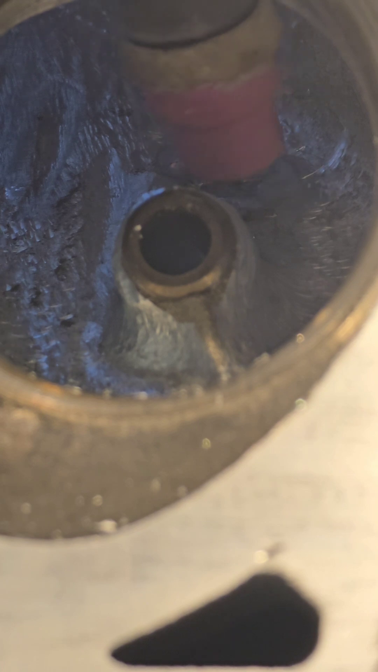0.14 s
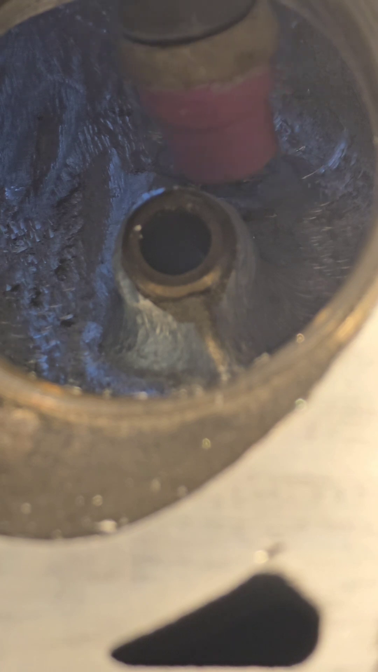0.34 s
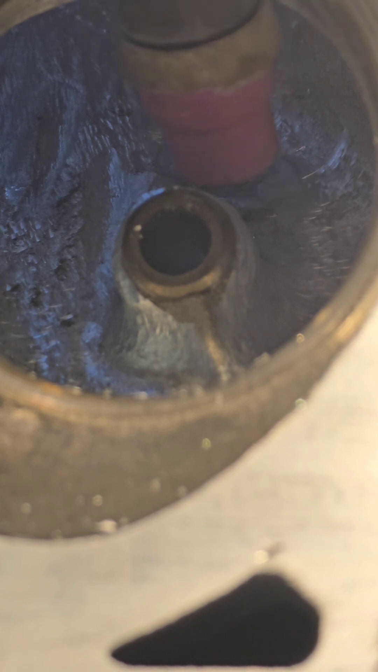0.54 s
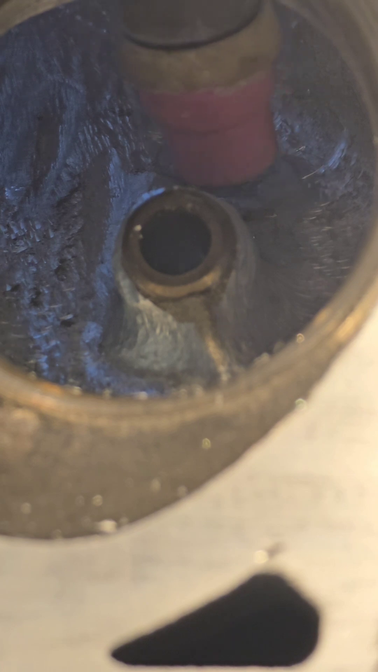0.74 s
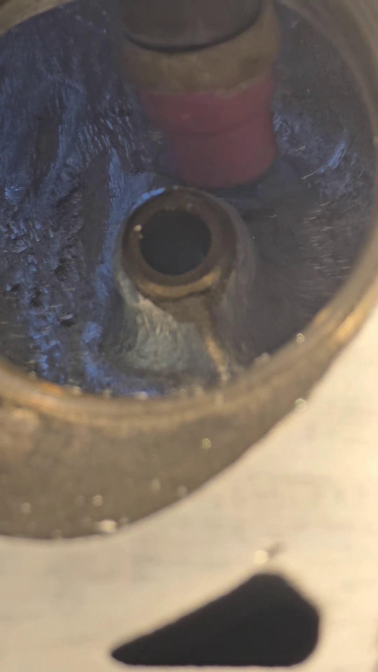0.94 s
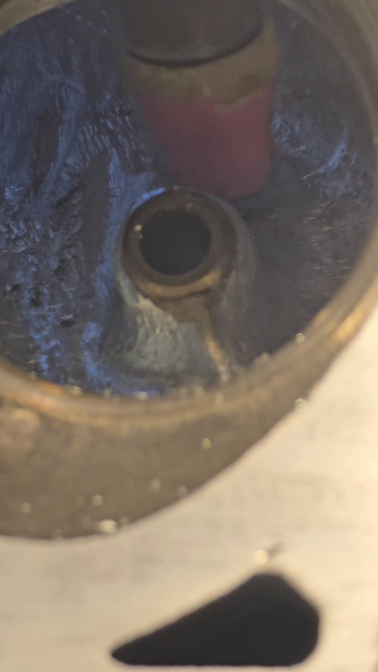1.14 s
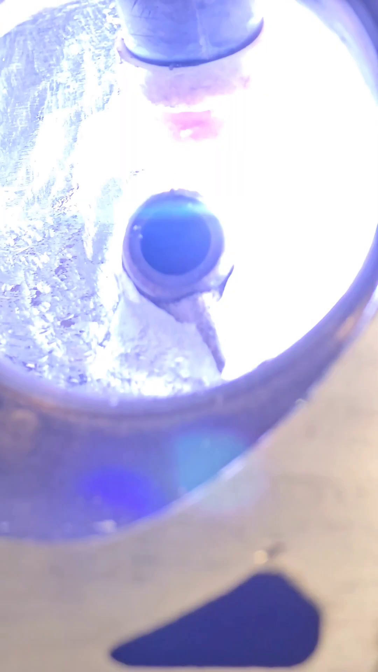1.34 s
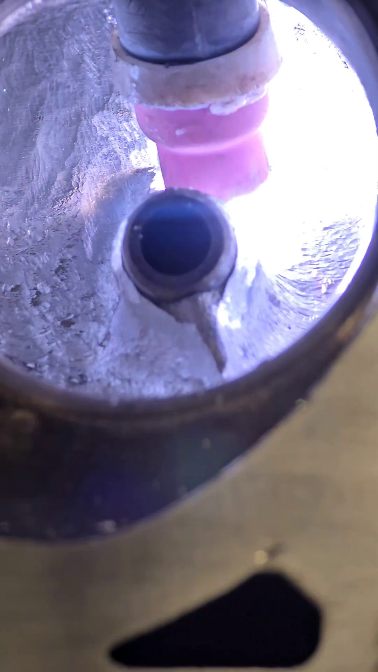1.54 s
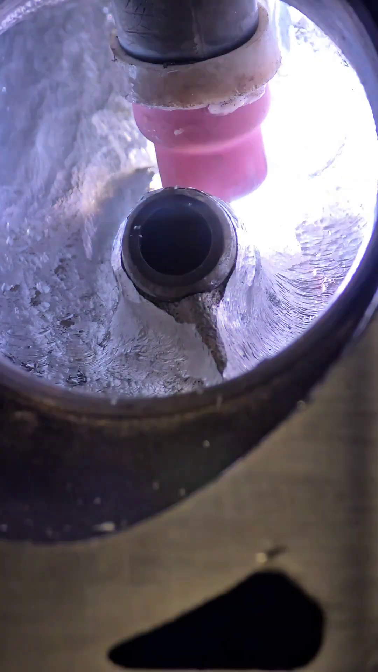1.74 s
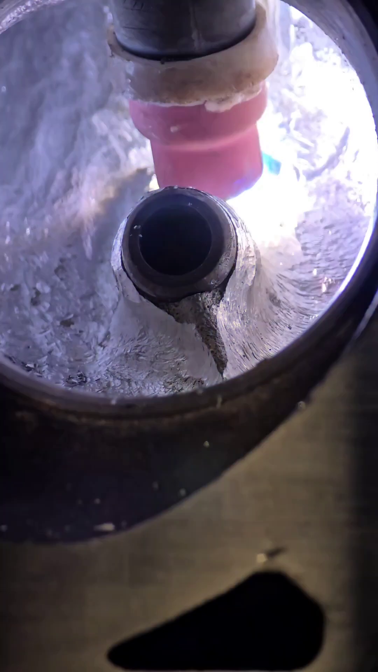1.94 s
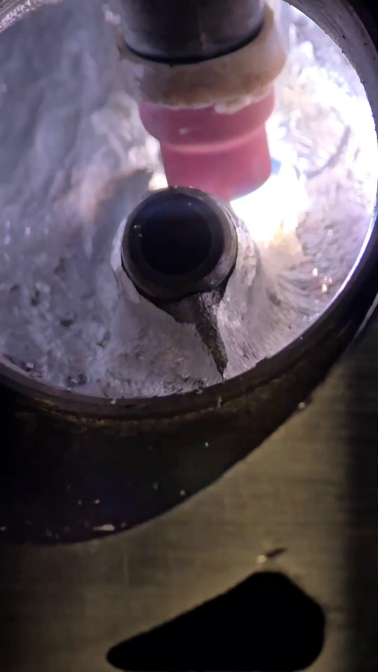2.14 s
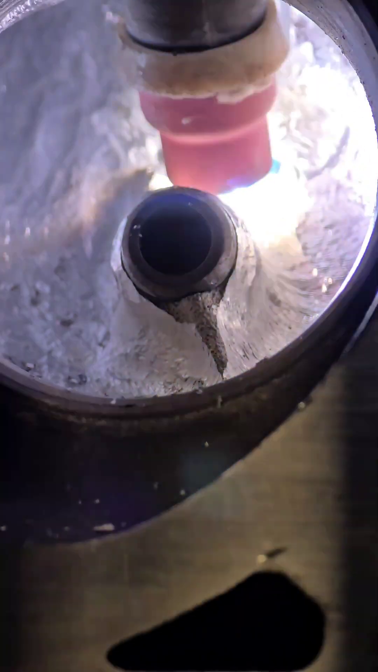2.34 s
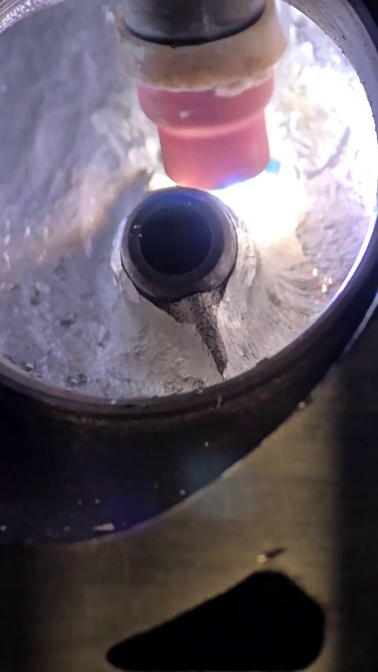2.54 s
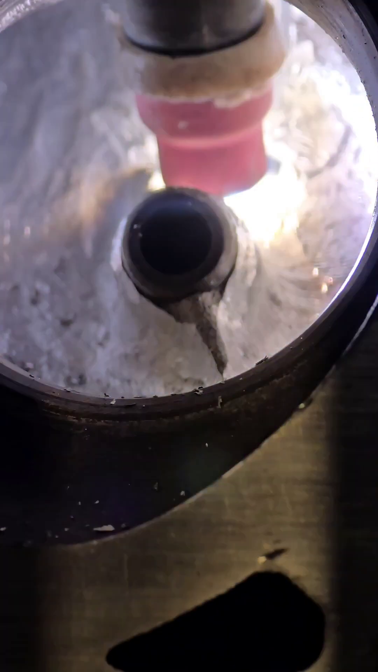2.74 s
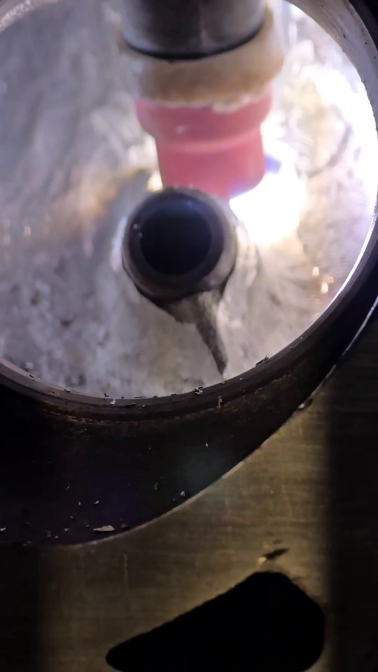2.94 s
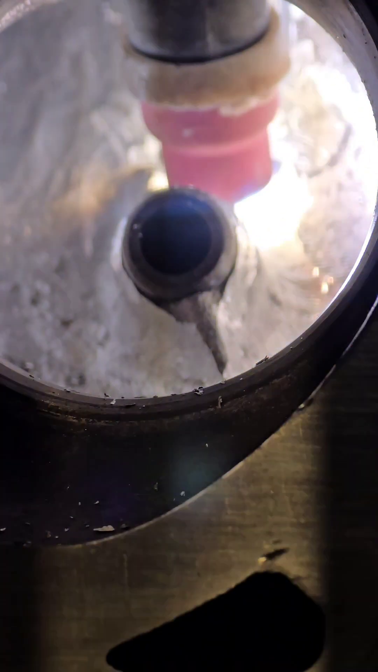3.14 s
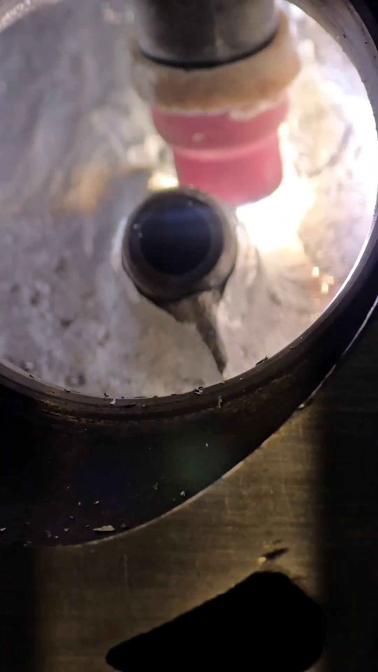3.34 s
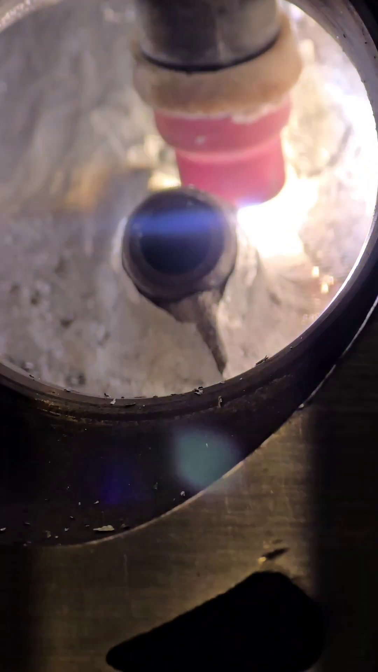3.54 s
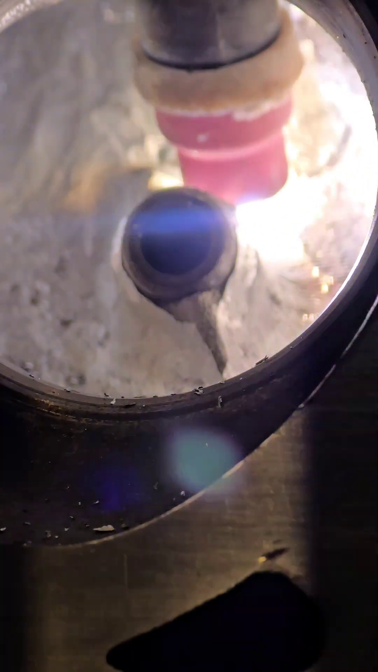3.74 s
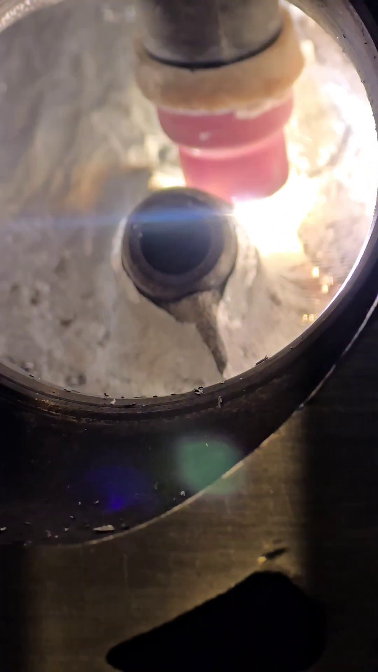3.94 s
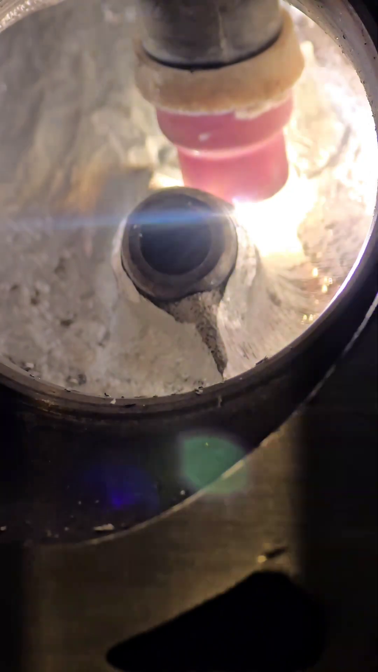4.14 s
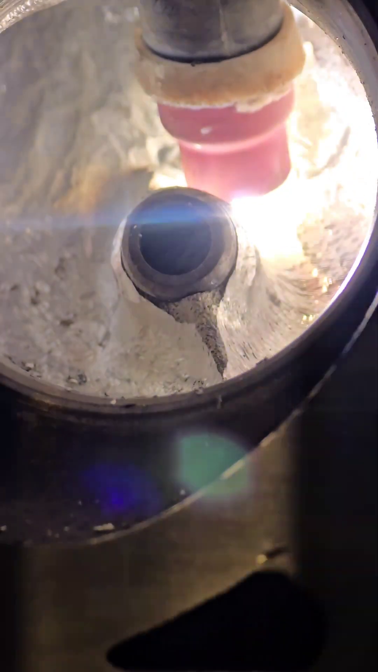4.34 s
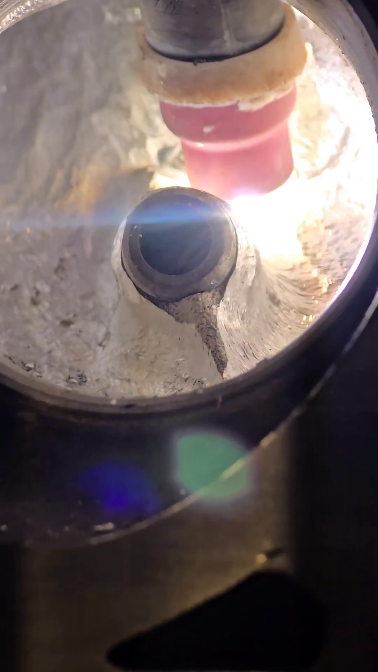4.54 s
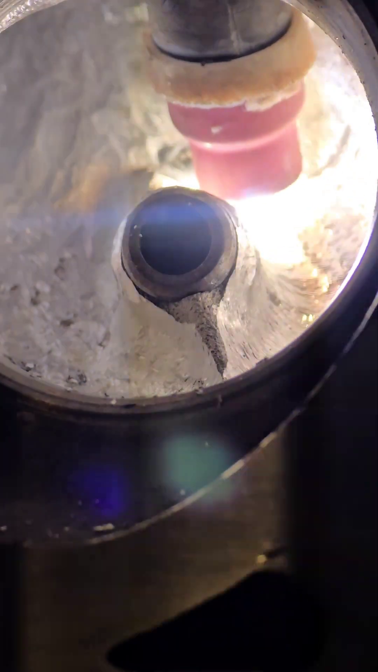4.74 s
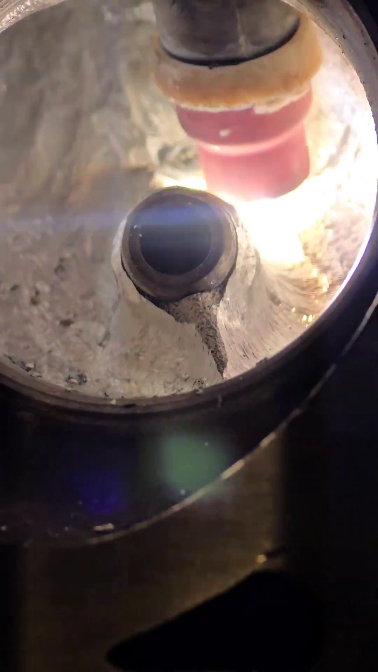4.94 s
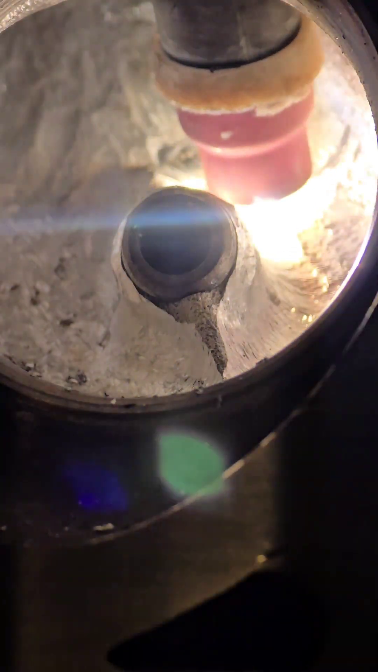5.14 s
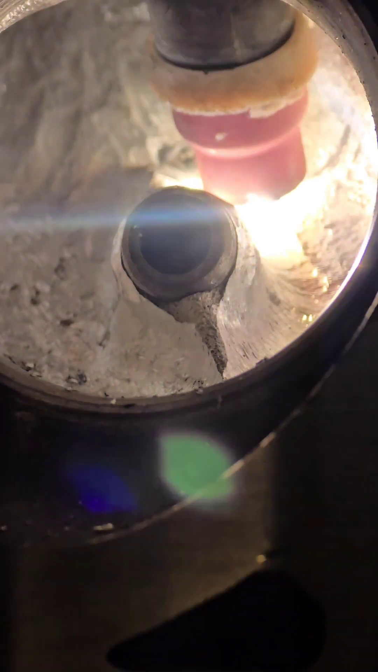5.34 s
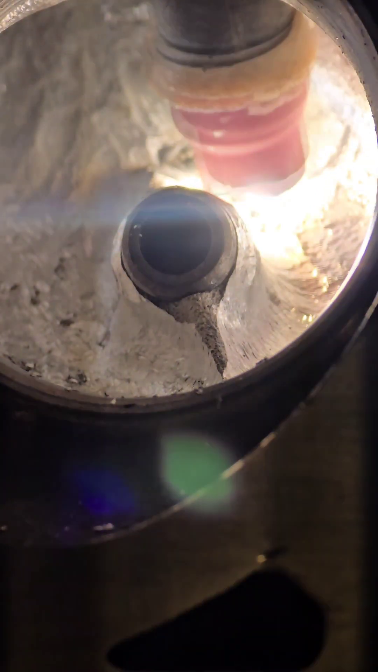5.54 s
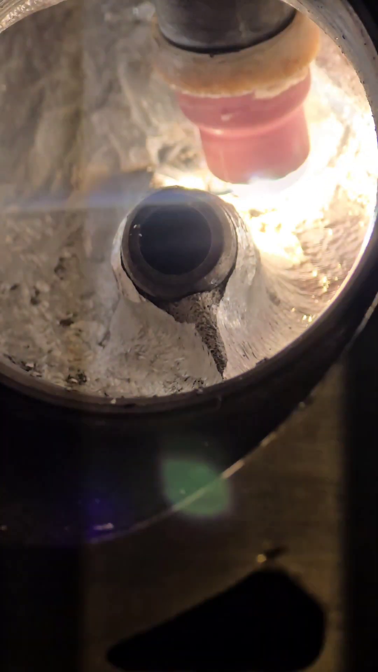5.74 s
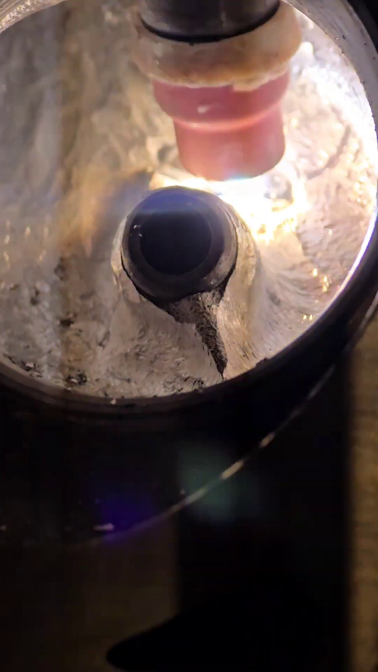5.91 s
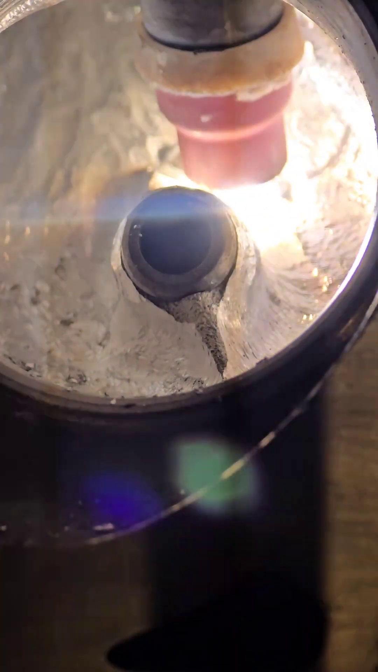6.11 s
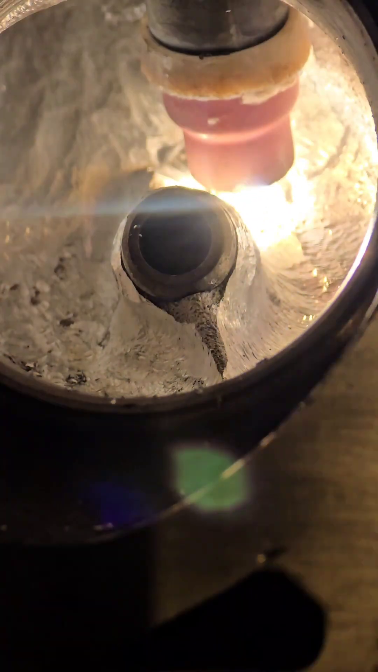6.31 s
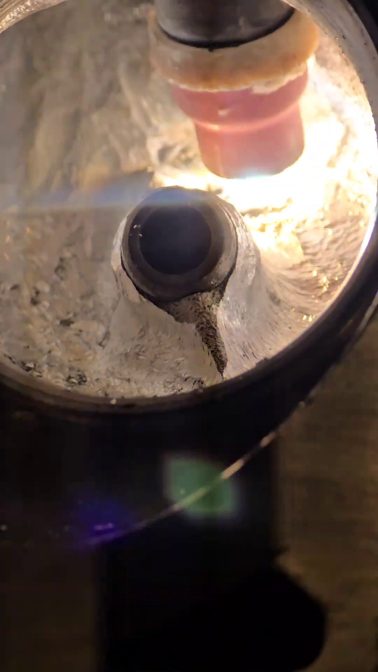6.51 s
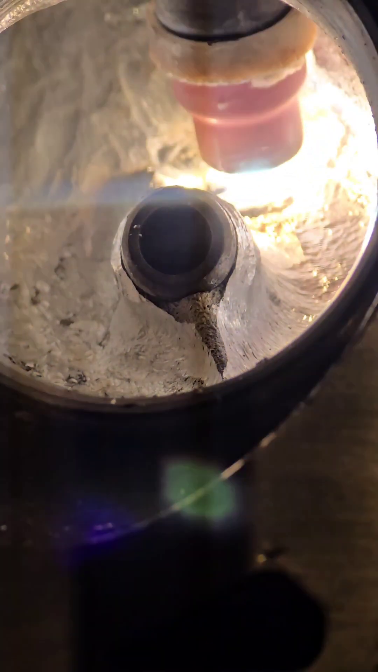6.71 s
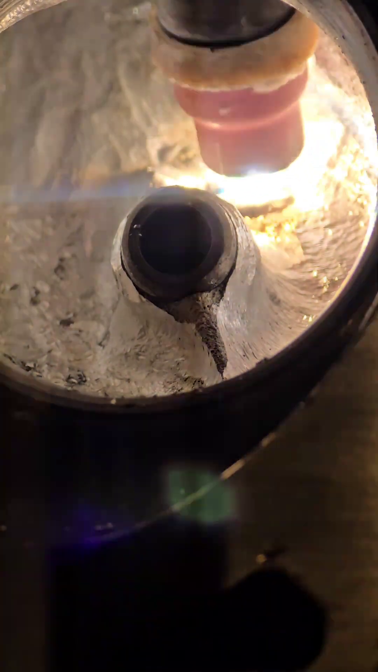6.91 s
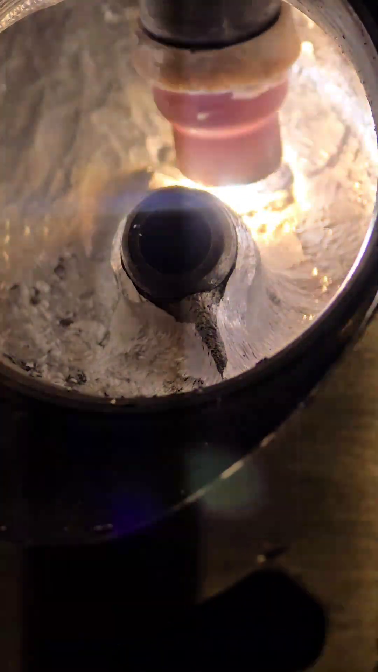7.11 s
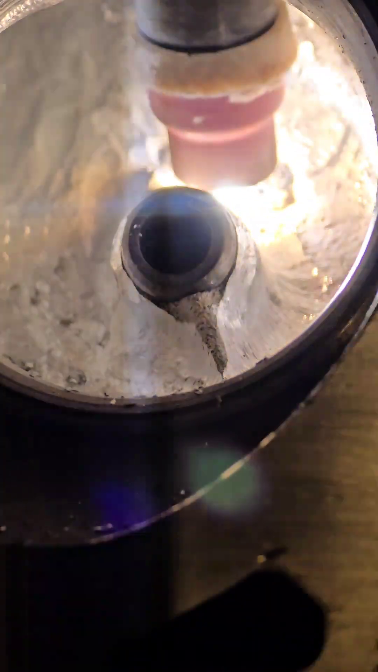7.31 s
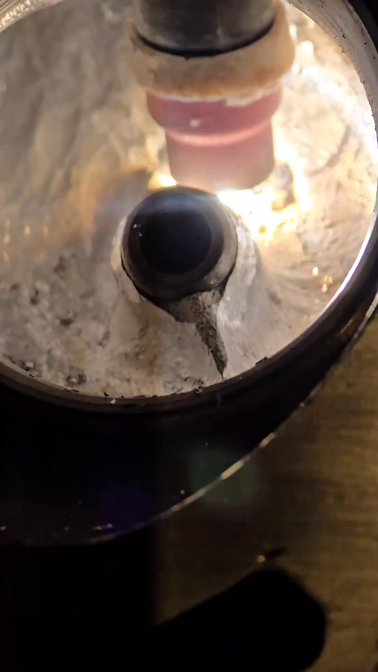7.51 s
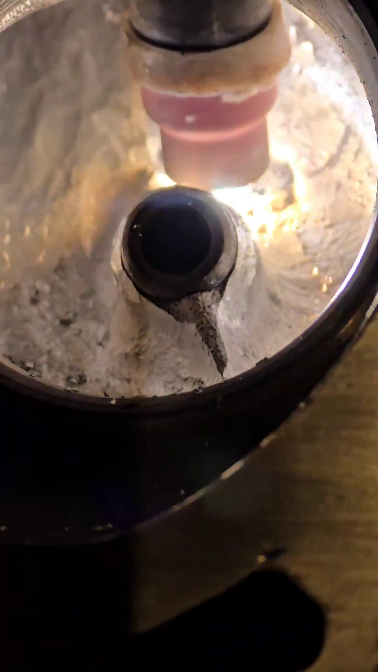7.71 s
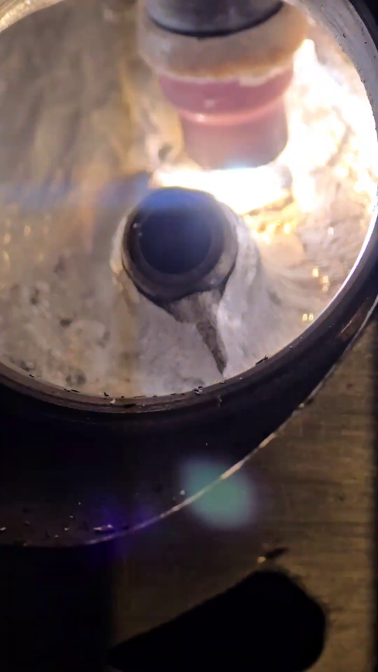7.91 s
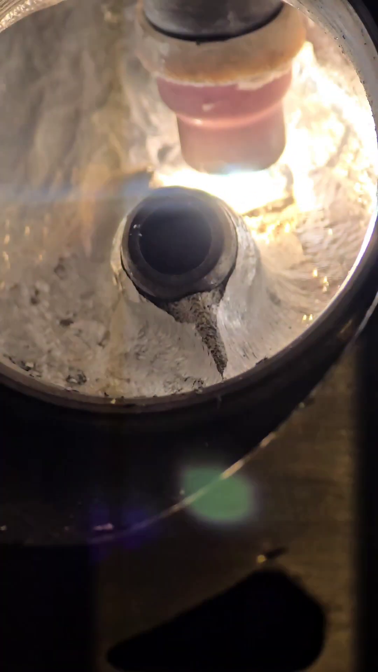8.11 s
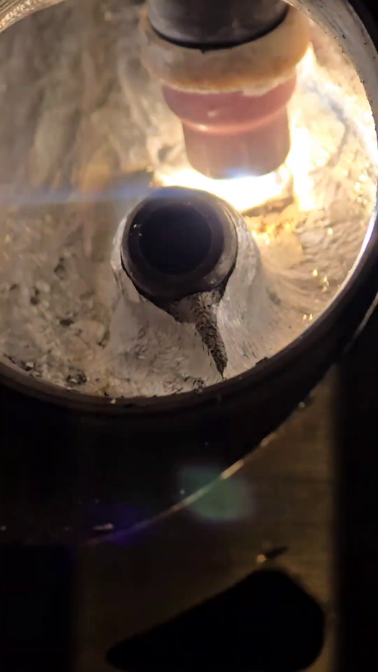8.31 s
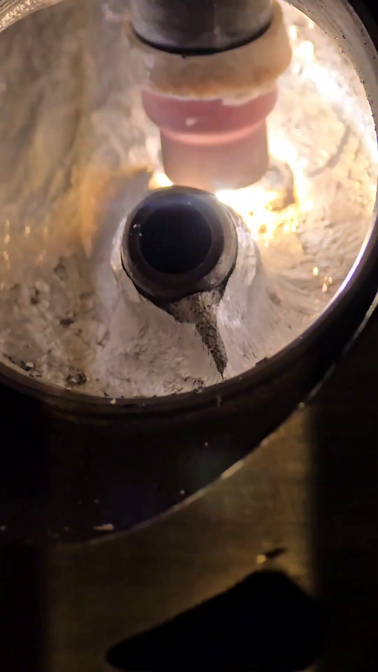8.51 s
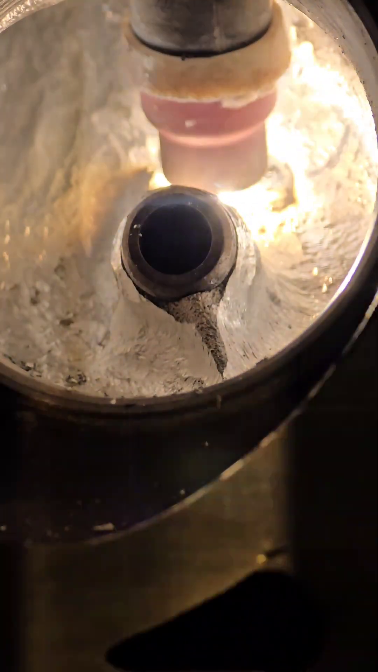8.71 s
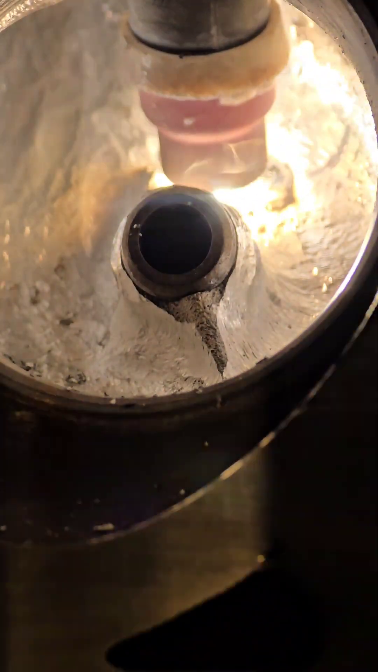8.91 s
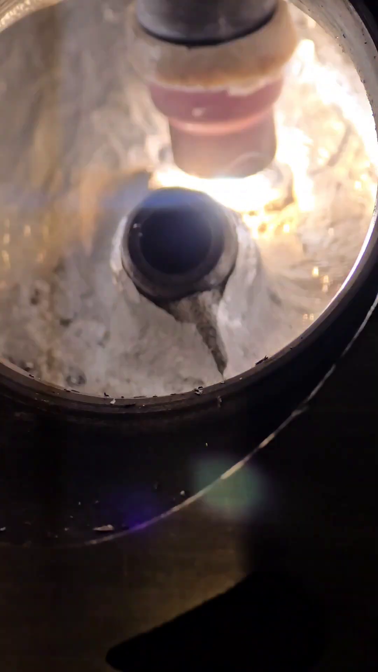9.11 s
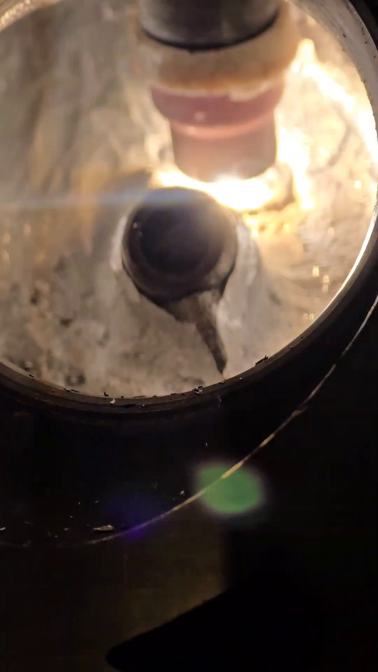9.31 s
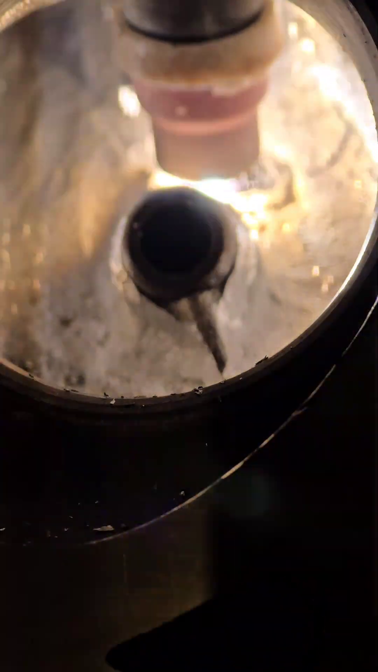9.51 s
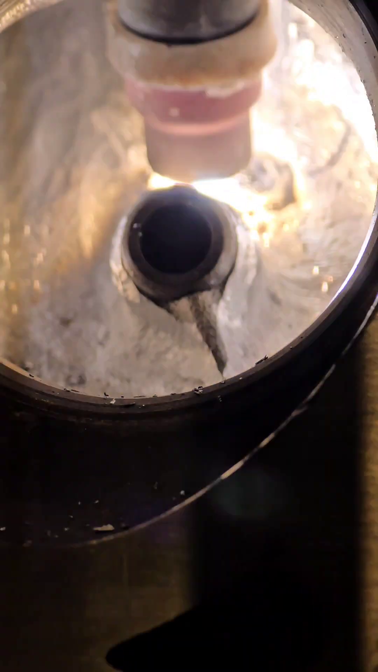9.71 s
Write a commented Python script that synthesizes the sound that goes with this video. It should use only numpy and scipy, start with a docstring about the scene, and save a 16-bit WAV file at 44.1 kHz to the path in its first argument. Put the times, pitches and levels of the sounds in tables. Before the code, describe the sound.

At first there is only low, distant fan rumble and a very faint gas hiss. Around 0.33 seconds a foot pedal gives two or three soft, dull knocks, then a tiny rattle until 0.5. At 0.76 a short airy valve puff begins a dense, grainy hiss of sparks, swelling quickly then sagging. At 1.45 the arc bridges with a pop and a dull, lumpy roar for a tenth of a second. From 1.55 to about 9.76 a loud alternating-current buzz continues: about eighty cycles a second, two sharp snaps per cycle, hiss between. It rings hollowly in the aluminium recess, strongest before 4.5, easing slightly and duller around 5.3-6. A thin nozzle ring comes and goes. Low, soft air thuds bump one side, mostly the right; little molten pops dot 6.9 to 9 seconds. Close, wide stereo phone pickup.

```python
"""A welding arc on alternating current snaps twice per cycle in a round aluminium recess and hisses between snaps.
Before it, sparks hiss across the gap and a steady-current arc roars for a moment. Both sources are shaped noise;
the snaps are filtered clicks. Recess resonances and echoes colour the arc differently at a phone's two ports.
Pool pops, a ringing nozzle, a valve puff, pedal knocks and draught thuds surround it, over faint gas and shop rumble."""
import sys
import numpy as np
from scipy import signal
from scipy.fft import rfft, irfft
from scipy.io import wavfile
from scipy.ndimage import uniform_filter1d

SR = 44100
rng = np.random.default_rng(int(sys.argv[2]) if len(sys.argv) > 2 else 0)


def persist_wave(psi):
    """Save psi, clipped to +-1, as 16-bit WAV."""
    counts = np.round(np.clip(psi, -1, 1) * 32767).astype(np.int16)
    wavfile.write(sys.argv[1], SR, np.atleast_2d(counts).T)


N = 430416

# Burning arc, level of the snaps before the recess: (time [s], level [dB])
ARC = [(1.545, -16.5), (3.0, -17.5), (3.21, -15.5), (4.45, -19.5), (5.02, -18.5), (5.68, -23),
       (6.14, -19.5), (6.5, -21), (9.14, -21.5), (9.76, -21.5)]
# Band the hiss is weak in, where the recess rings most: (frequency [Hz], width [Hz], share removed [0-1])
HISS_SPARES = (1360, 440, 0.27)
# Fresh arc smoulders, then roars in lumps until the current alternates: (time [s], level [dB])
ROAR = [(1.448, -11), (1.454, -16), (1.466, -12), (1.473, -9.5), (1.49, -7.5), (1.51, -10.5), (1.523, -10),
        (1.527, -10), (1.536, -7), (1.539, -19), (1.544, -7.5), (1.548, -11)]
# Resonances of recess and port, torch low:
# (frequency [Hz], width [Hz], level at the first spot [dB], level at the last spot [dB])
NEAR_LEFT = [(432, 510, -9.5, -5.5), (549, 16, 5, -2), (832, 303, -5.5, -1.5), (1214, 115, 14.5, 7.5),
             (1557, 500, 1.5, 4.5), (2108, 294, 2, 1), (2980, 245, -7, 6.5), (3180, 140, -0.5, -30),
             (3650, 107, -2, 9.5), (4240, 540, -2, 4.5), (4100, 200, -30, -27), (5540, 320, -1, 6),
             (5674, 180, 2.5, 6), (6700, 200, -10, 1.5), (6950, 420, -6, -13), (7560, 1270, -4, 5),
             (9170, 870, -16, -21), (9340, 2900, -6.5, -3.5), (10380, 720, 0, -1.5), (11510, 780, 1, 7),
             (12100, 1260, -14, -3), (12930, 970, -5.5, 5.5), (13600, 690, -5, -19), (14700, 1200, -14, 4),
             (15100, 1550, 0.5, 2)]
NEAR_RIGHT = [(267, 370, -13.5, -8.5), (550, 114, -2.5, -1.5), (825, 69, 4, 3), (1254.5, 92, 19.5, 9),
              (1377, 194, 10.5, 13), (1802, 237, 9.5, 11.5), (2180, 650, -5.5, -3), (2663, 76, -1.5, 0),
              (3190, 410, -28, 4.5), (3700, 1380, -5.5, 1), (4060, 68, 5, 3), (4640, 210, -23, 9),
              (4840, 330, -3, -0.5), (5634, 780, 3, 9.5), (6130, 120, 3.5, 10), (6376, 440, -2.5, 7.5),
              (7284, 630, -2, 6.5), (9600, 550, -8, -11), (9360, 210, -11, -10), (9600, 550, -32, -3.5),
              (11180, 320, -8, 3.5), (11410, 650, -3.5, -7), (12400, 730, -4, 5), (12240, 1100, -16, 2),
              (13870, 950, -1, 7), (14710, 890, -11, -19), (15300, 2600, 0, -9.5)]
# Resonances of recess and port, torch still held high: (frequency [Hz], width [Hz], level [dB])
RAISED_LEFT = [(730, 920, 5.5), (1120, 110, 16.5), (1490, 480, 1.5), (2090, 250, 4.5), (2930, 400, 3),
               (3750, 630, 6), (4660, 590, 3.5), (5570, 740, 9), (6300, 1200, 3.5), (7560, 530, 13),
               (8430, 320, 9.5), (9300, 710, 9), (10070, 330, 13), (10300, 340, -2), (11240, 670, 10),
               (12000, 360, 1), (12760, 640, 12.5), (13700, 950, 10), (14700, 430, 2), (15300, 730, 5)]
RAISED_RIGHT = [(620, 520, 6), (1147, 120, 18), (1380, 160, 8), (1920, 610, 6), (3350, 840, 3),
                (3730, 110, 13), (4670, 370, 0), (5760, 1370, 13.5), (7000, 920, 8), (8610, 390, -17),
                (9450, 650, 3), (9820, 150, -6.0), (10800, 1000, 4.5), (11450, 450, 9), (12400, 770, 5),
                (13000, 740, 5), (13820, 810, -2), (14380, 550, 0.7), (15300, 920, 10)]
# Bands cancelled with the torch low: (frequency [Hz], width [Hz], share removed [0-1])
ARC_HOLLOWS = [(2260, 240, .5), (2570, 140, 0.3), (3250, 110, 0.52), (5030, 240, 0.27)]
# Bands cancelled with the torch high: (frequency [Hz], width [Hz], share removed [0-1])
HOLLOWS = [(2380, 360, 0.9), (2650, 400, 0.71), (4250, 240, .9), (6900, 180, 0.46), (7950, 250, .6)]
# Bands that dull as the torch lifts: (frequency [Hz], width [Hz], greatest share removed [0-1])
LIFT = [(6960, 1100, .7), (7600, 960, 0.42), (8700, 320, 0.32), (10400, 640, 0.3), (11650, 610, 0.45),
        (3950, 300, .6)]
# Treble bands of the arc whose levels move: (frequency [Hz], width [Hz])
TREBLE_BANDS = [(7300, 1900), (9800, 1700), (12200, 1500), (4450, 1050), (14600, 1700)]
# Level change of those bands, in the same order:
# (time [s], first [dB], second [dB], third [dB], fourth [dB], fifth [dB])
TREBLE = [(1.545, -2, 0, -2, 0.5, 2), (2.2, 1, 2, 0.5, -0.5, -1), (2.66, 0.5, -3, -0.5, 1, 0),
          (3.2, 2, -2, 0.5, 1, -4), (3.5, -1.5, 2.5, -0.5, 0, -3), (4.04, -1, -0.5, -1, 1, 0),
          (4.7, -1, -0.5, -0.5, 1.5, -4), (5.03, -1, -4, 3.5, -1.5, -2), (5.5, 0, 6, 4, 1, -3),
          (5.8, -1, 3, 0, -0.5, 1), (6.16, -1, 1, 3, 2.5, -1), (6.4, -2, 0, 0, -1.5, 2),
          (7.0, 1, 2, 0.5, -1, 1.5), (7.74, 1.5, -4, -1, -1.5, -2), (8.12, 0.5, 0, 3, -0.5, 3),
          (8.5, 1.5, -2, -1.5, 1, -0.5), (9.3, -1, -1, -0.5, -2, -0.5), (9.76, -0.5, 0, -2.5, 2, -1)]
# Low partials of the arc that swell and fade singly: (frequency [Hz], width [Hz])
HUM_BANDS = [(240, 81), (400, 64), (520, 100), (800, 140)]
# Level change of the arc's low buzz: (time [s], level [dB])
LOW_BUZZ = [(1.545, -0.5), (5.15, -1), (5.25, -2.5), (5.82, -1), (5.92, 1.5), (6.7, -2), (6.9, -1.5),
            (7.2, 0.5), (7.4, -1), (8.04, 0), (8.36, -4.5), (8.45, 3.5), (8.6, 1.5), (8.9, -2), (9.1, 0.5),
            (9.5, -5), (9.6, 2.5), (9.76, -0.5)]
# Pops of the molten pool, the first as the arc bridges: (time [s], starting level [dB], pitch [Hz])
POPS = [(1.448, -20, 300), (6.909, -24, 320), (7.727, -26, 380), (7.908, -23, 300), (8.031, -17.5, 336),
        (8.195, -28, 198), (8.444, -27, 180), (8.512, -25, 520), (8.571, -24, 300), (8.92, -21.5, 260),
        (8.996, -24, 252)]
# Nozzle ringing: (time [s], level [dB])
NOZZLE = [(1.545, -31), (2.05, -41), (3.0, -49), (3.5, -35), (4.0, -35.5), (4.15, -54), (5.8, -51),
          (6.0, -44), (6.4, -55), (7.2, -46), (9.0, -53), (9.76, -38)]
# Pedal knocks, then a faint rattle: (time [s], level [dB], lift of the upper modes [dB])
PEDAL = [(0.329, -26, -12), (0.345, -23, -14), (0.362, -33, -6), (0.408, -47, 17), (0.43, -45, 8),
         (0.47, -48, 12)]
# Modes of the pedal: (frequency [Hz], level [dB], time to fall by 60 dB [s])
PEDAL_MODES = [(193, 1, 0.071), (298, -4, 0.13), (433, 6, 0.057), (481, 6.5, 0.075), (600, -3, 0.07),
               (723, -5, .09), (1400, -14, .07), (1740, -18, .06), (3140, -19, 0.12)]
# Plainest draught thuds, before their swell shape: (time [s], level [dB], left minus right [dB])
THUDS = [(1.443, -20, -7), (1.525, -26, -8), (1.572, -25, -14), (1.761, -21, -20), (1.9, -26, -14),
         (2.235, -23, -14), (2.28, -23, 10), (2.823, -23, -18), (3.876, -21, -16), (4.862, -21, -17),
         (5.201, -24, -14), (5.316, -23, -13), (6.257, -22, -14), (6.355, -23, -16), (6.873, -22, 12),
         (7.595, -22, -14), (7.669, -22, -21), (7.798, -26, -14), (8.197, -25, -14), (8.448, -28, -14),
         (8.764, -20, -10), (8.927, -21, -10), (9.464, -25, -12)]
# Resonances of the shielding gas: (frequency [Hz], width [Hz], level [dB])
GAS = [(3080, 200, 1), (3490, 60, -1), (4800, 140, 1), (5230, 130, -1), (5510, 170, 4), (6180, 260, 2),
       (6520, 210, 1), (6880, 200, -8), (8100, 150, -26), (12000, 290, -6), (12800, 74, -8),
       (13100, 99, -9), (14000, 130, -10), (14900, 56, -12), (15400, 210, -8)]
# Spectrum of the shop: (frequency [Hz], relative level per Hz [dB])
SHOP = [(20, -24), (40, -14), (70, -8), (95, 3), (125, -1), (150, -3), (183, 2), (220, -6), (270, -3.5),
        (340, -7.5), (450, -19), (900, -25.5), (1500, -28), (2500, -27), (4200, -34), (7500, -54),
        (16000, -64)]
# Tilt of the shop between the ports: (frequency [Hz], left minus right [dB])
SHOP_BALANCE = [(60, 1), (110, -1), (200, 1), (380, 0), (700, -3.0), (1290, -3), (2380, 8), (4400, 6),
                (8120, -7.0), (15000, -4.0)]

CYCLE_HZ, FIRST_SNAP_S = 79.995, 1.54535
POSITIVE_SHARE = 0.3514  # part of a cycle from restrike to the way back
SLIP_S, SLIP_MS = (5.3, 5.9), 0.754  # the beat fades over to one that comes slightly earlier
WAVER_DB, WAVER_PER_S = 2.5, 18  # the snaps waver, more as the torch travels
HISS_DB, HISS_FOLLOWS = -13.5, 0.48  # hiss level = HISS_DB + HISS_FOLLOWS * snap level
SPARK_S, SPARK_DB = (0.756, 1.4455), -13.5
SPARK_SWELL_S, SPARK_SAG_DB_PER_S = 0.07, 6
SPARK_BODY_S = 0.076  # the low body of the sparks swells later than their treble
TRAVEL_S, TRAVEL_SHARE = (1.93, 7.3), (0.1, 0.97)  # the torch eases from near its first spot to near its last
PORT_LAG = 11  # samples by which the right port hears later
SCATTER_DB, SCATTER_HOLD_S = -7.5, 0.6
FLICKER_DB, FLICKER_PER_S = 1.8, 9
HUM_SWELL_DB, HUM_SWELL_PER_S = 3, 3.503
LOW_BUZZ_HZ, LOW_FLICKER_DB, LOW_FLICKER_PER_S = 1610, 1.5, 8
POP_CYCLES = 0.85  # cycles in which a pop falls to 1/e
POP_TICK_DB, POP_TICK_RATIO = -5, 2.4  # level and pitch of the tick against its pop
NOZZLE_HZ, NOZZLE_WIDTH_HZ = 4080, 20
VALVE_DB, VALVE_HZ, VALVE_WIDTH_HZ, VALVE_S = -19, 1620, 460, 0.052
PEDAL_UPPER_HZ = 1000
PUFFS_PER_S, PUFF_DB, PUFF_SPREAD_DB = 4, -35, 1  # weaker thuds at random
PUFF_PAN_DB, PUFF_PAN_SPREAD_DB = -22, 15  # left minus right
GAS_LEFT_DB, GAS_RIGHT_DB = -48.5, -44
SHOP_DB, SHOP_SINKS_DB, SHOP_SINK_S = -40.5, 13, 0.59  # the rumble sinks away once the sparks start
TOP_HZ = 15780


def arc():
    """The plasma snaps at both current reversals and hisses between them."""
    sharp, blunt = reversals()
    snap_sound, hiss_sound = snaps(sharp, blunt), hiss(sharp)
    snap_db = curve(ARC) + WAVER_DB * travel() * walk(WAVER_PER_S)
    hiss_db = HISS_DB + HISS_FOLLOWS * snap_db
    return (undb(snap_db) * snap_sound + undb(hiss_db) * hiss_sound) * gate(ARC[0][0], ARC[-1][0])


def reversals():
    """The two current reversals of each cycle as click trains, with a little chance in time and level."""
    start = cycle_starts()
    chance = rng.standard_normal((len(start), 4))
    late = np.clip((start - SLIP_S[0]) / (SLIP_S[1] - SLIP_S[0]), 0, 1)
    sharp = blunt = 0
    for share, shift in ((np.sqrt(1 - late), 0), (np.sqrt(late), SLIP_MS / 1000)):
        restrike = start - shift + 3e-6 * chance[:, 0]
        way_back = start - shift + POSITIVE_SHARE / CYCLE_HZ + 3e-6 * chance[:, 2]
        sharp = sharp + clicks(restrike, share * undb(1.3 * chance[:, 1]))
        blunt = blunt + clicks(way_back, share * undb(1.5 * chance[:, 3]))
    return sharp, blunt


def snaps(sharp, blunt):
    """The plasma column pushes the air: sharply on restrike, more bluntly on the way back."""
    # the restrike is a quick push and pull, then a slower swell of the column
    restrike = sharp - np.roll(sharp, 1) + undb(3.0) * soften(soften(sharp, 880.0), 880.0)
    both = soften(restrike + undb(-1.0) * blunt, 8880.0)
    return unit(both - soften(both, 383.0))


def hiss(sharp):
    """Turbulence around the plasma, flaring just after each restrike and dying over 1.5 ms."""
    flare = signal.lfilter([1], [1, -np.exp(-1000 / (1.5 * SR))], np.abs(sharp))
    noise = turbulence(apart=1.09) * (1 + 0.5 * flare)
    noise = unit(0.53 * noise + 0.5 * soften(noise, 5700.0) + 1.35 * soften(noise, 455.0))
    return hollow(noise * undb(2.15 * walk(12)), [HISS_SPARES])


def strike():
    """Steady-current arc for a moment: a dull, lumpy roar of low-passed noise."""
    noise = rng.standard_normal(N) * undb(1.5 * walk(150))
    roar = hollow(0.04 * noise + soften(noise, 2900.0), [HISS_SPARES])
    return unit(roar) * undb(curve(ROAR)) * gate(ROAR[0][0], ROAR[-1][0])


def arc_in_recess():
    """Arc and roar through echoes and resonances that shift as the torch travels and lifts."""
    burning, way = scatter(arc() + strike()), travel()
    first_spot = ports(burning * (1 - way), NEAR_LEFT, NEAR_RIGHT, column=2)
    last_spot = ports(burning * way, NEAR_LEFT, NEAR_RIGHT, column=3)
    near = hollow(first_spot + last_spot, ARC_HOLLOWS)
    # the torch lifts while the beat slips, dulling some bands
    lifted = gate(SLIP_S[0] + 0.053, SLIP_S[1] + 0.096, edge_s=0.072)
    near = hollow(near, LIFT, lifted * np.clip(1.05 + 0.25 * walk(15), 0, 1))
    return shift_bands(near)


def shift_bands(near):
    """Treble bands, low partials and low buzz of the arc rise and fall, each by itself."""
    times, *levels_db = np.transpose(TREBLE)
    for (hz, width_hz), db in zip(TREBLE_BANDS, levels_db):
        gain = undb(curve(np.c_[times, db]) + flicker())
        near = near + (gain - 1) * band(near, hz, width_hz)
    for hz, width_hz in HUM_BANDS:
        gain = undb(HUM_SWELL_DB * walk(HUM_SWELL_PER_S))
        near = near + (gain - 1) * band(near, hz, width_hz)
    low = signal.sosfiltfilt(signal.butter(2, LOW_BUZZ_HZ, fs=SR, output="sos"), near)
    gain = undb(curve(LOW_BUZZ) + LOW_FLICKER_DB * walk(LOW_FLICKER_PER_S))
    return near + (gain - 1) * low


def scatter(x, scatter_ms=1.44):
    """Short bright echoes off the recess wall, different at each port, changing as time passes."""
    t, step, length = np.arange(600) / SR, int(SCATTER_HOLD_S * SR), x.shape[1]
    out = np.pad(x, ((0, 0), (0, 2 * step + 600)))
    window = np.sin(np.pi * np.arange(2 * step) / (2 * step))
    # overlapping stretches, each with its own echoes
    for i in range(-step, length, step):
        echoes = rng.standard_normal((2, len(t))) * np.exp(-t * 1000 / scatter_ms) * (t > 0.0002)
        echoes = echoes - soften(echoes, 2800.0)
        echoes = echoes * undb(SCATTER_DB) / np.sqrt(np.sum(echoes ** 2, axis=1, keepdims=True))
        first = max(i, 0)
        part = x[:, first:i + 2 * step] * window[max(-i, 0):length - i]
        part = signal.fftconvolve(part, echoes, axes=1)
        out[:, first:first + part.shape[1]] += part
    return out[:, :length]


def ports(x, left, right, column=2):
    """Resonances on the way to each port; the right port hears it a little later."""
    paths = np.array([response(left, column), np.roll(response(right, column), PORT_LAG)])
    return signal.oaconvolve(x, paths, axes=1)[:, :N]


def travel():
    """How far the torch is from its first spot (0) to its last (1), eased at both ends."""
    way = np.clip(since(TRAVEL_S[0]) / (TRAVEL_S[1] - TRAVEL_S[0]), 0, 1)
    first, last = TRAVEL_SHARE
    return first + (last - first) * np.sin(np.pi / 2 * way) ** 2


def flicker():
    """Level wander in dB, partly shared by the two ports."""
    shared = walk(FLICKER_PER_S)
    own = np.array([walk(FLICKER_PER_S), walk(FLICKER_PER_S)])
    return FLICKER_DB * (shared + 0.75 * own)


def sparks():
    """Dense random sparks in escaping gas: grainy noise that swells, sags and stops as the arc bridges."""
    grains = turbulence(apart=0.77) * undb(1.3 * walk(400) + 2.8 * walk(24.6))
    t = since(SPARK_S[0])
    grains = grains - np.exp(-(t / SPARK_BODY_S) ** 2) * soften(grains, 2100.0)
    swell = 1 - np.exp(-(t / SPARK_SWELL_S) ** 1.24)
    return unit(grains) * swell * undb(SPARK_DB - SPARK_SAG_DB_PER_S * t) * gate(*SPARK_S)


def pops():
    """Each pop of the pool is a damped pressure pulse that opens with a higher, shorter tick."""
    out, t = np.zeros(N), np.arange(1500) / SR
    for s, db, hz in POPS:
        i = int(s * SR)
        for part_db, part_hz in ((db, hz), (db + POP_TICK_DB, hz * POP_TICK_RATIO)):
            pulse = np.exp(-t * part_hz / POP_CYCLES) * np.sin(2 * np.pi * part_hz * t)
            out[i:i + 1500] += undb(part_db) * pulse
    return out


def nozzle():
    """The nozzle rings on the multiple of the current cycle that fits it."""
    times = cycle_starts()
    beat = clicks(times, undb(1.8 * rng.standard_normal(len(times))))
    ring = unit(band(beat, NOZZLE_HZ, NOZZLE_WIDTH_HZ))
    ring = ring * undb(curve(NOZZLE) + 3.0 * walk(8.9)) * gate(ARC[0][0], ARC[-1][0])
    return np.array([ring, np.roll(ring, PORT_LAG)])


def valve():
    """The gas valve opens as the sparks begin: a short, decaying puff of band-passed noise."""
    puff = unit(band(rng.standard_normal(N), VALVE_HZ, VALVE_WIDTH_HZ))
    puff = puff * undb(VALVE_DB) * np.exp(-since(SPARK_S[0]) / VALVE_S)
    puff = puff * gate(SPARK_S[0] + 0.006, SPARK_S[1], edge_s=0.0087)
    return np.array([puff, np.roll(puff, PORT_LAG)])


def pedal():
    """Soft knocks of the foot pedal and a faint rattle as it settles, as decaying modes."""
    t, out = np.arange(8000) / SR, np.zeros(N)
    soft_start = 1 - np.exp(-(t / 0.0035) ** 2)
    for s, level_db, upper_db in PEDAL:
        i = int(s * SR)
        for hz, db, t60 in PEDAL_MODES:
            ring = np.exp(-np.log(1000) * t / t60) * np.sin(2 * np.pi * hz * t) * soft_start
            out[i:i + 8000] += undb(level_db + db + upper_db * (hz > PEDAL_UPPER_HZ)) * ring
    return out


def thuds():
    """Puffs of warm air push mostly on one port, each a swelling and fading low sine."""
    out, t = np.zeros((2, N + 4000)), np.arange(4000) / SR
    rows = np.vstack([THUDS, random_puffs()])
    swell = t / 0.0065 * np.exp(1 - t / 0.0047)
    for (s, db, pan_db), (pitch, turn, skew) in zip(rows, rng.random((len(rows), 3))):
        i = int((s - 0.007) * SR)  # the swell begins ahead of the thud
        gains = undb(db + np.minimum([[pan_db], [-pan_db]], 0))
        turns = np.c_[[turn, turn + 0.3 * skew]]  # phase at each port
        out[:, i:i + 4000] += gains * swell * np.sin(2 * np.pi * ((30 + 55 * pitch) * t + turns))
    return out[:, :N] + flutter()


def random_puffs():
    """Weaker thuds, one at a random moment in each slot while the arc burns."""
    slots = np.arange(ARC[0][0], N / SR - 1 / PUFFS_PER_S, 1 / PUFFS_PER_S)
    when = rng.random(len(slots))
    size, side = rng.standard_normal((len(slots), 2)).T
    level_db = PUFF_DB + PUFF_SPREAD_DB * size
    pan_db = PUFF_PAN_DB + PUFF_PAN_SPREAD_DB * side
    return np.transpose([slots + when / PUFFS_PER_S, level_db, pan_db])


def flutter():
    """Warm air flutters on each port by itself: low noise with a strongly wandering level."""
    out = np.zeros((2, N))
    low_band = signal.butter(2, (25.0, 160.0), "band", fs=SR, output="sos")
    for port, db in enumerate((-60.0, -59.0)):
        low = unit(signal.sosfilt(low_band, rng.standard_normal(N)))
        out[port] = low * undb(db + 13.0 * walk(25)) * gate(SPARK_S[0], ARC[-1][0])
    return out


def gas():
    """Shielding gas leaks faintly from the nozzle: separate resonant noise at each port."""
    broad = [(4340, 4900, -7.5), (13100, 3400, -8)]
    noise = signal.fftconvolve(rng.standard_normal((2, N)), response(GAS + broad)[None])
    return unit(noise[:, :N]) * undb(np.array([[GAS_LEFT_DB], [GAS_RIGHT_DB]]))


def shop():
    """Fans far off, as coloured noise; bass alike at both ports, treble unrelated."""
    hz = np.maximum(np.arange(N // 2 + 1) * SR / N, 1)
    colour_db, tilt_db = (np.interp(np.log(hz), np.log(np.array(table)[:, 0]), np.array(table)[:, 1])
                          for table in (SHOP, SHOP_BALANCE))
    alike = 0.98 / (1 + (hz / 800) ** 3)
    mid, side = rfft(rng.standard_normal((2, N)))
    sign = np.array([[1], [-1]])
    both = np.sqrt(1 + alike) * mid + sign * np.sqrt(1 - alike) * side
    rumble = unit(irfft(both * undb(colour_db + sign * tilt_db / 2), N))
    sunk_db = SHOP_SINKS_DB * (1 - np.exp(-since(SPARK_S[0]) / SHOP_SINK_S))
    return rumble * undb(SHOP_DB - sunk_db + 0.94 * walk(8.2))


def cycle_starts():
    """Times of the cycles of the current, in seconds."""
    return FIRST_SNAP_S + np.arange(int(N / SR * CYCLE_HZ)) / CYCLE_HZ


def clicks(times, sizes):
    """Band-limited clicks at exact times."""
    place = times[:, None] * SR
    index = np.floor(place).astype(int) + np.arange(-8, 9)
    keep = index[:, -1] < N
    shape = np.sinc(index - place) * np.cos(np.pi * (index - place) / 18) ** 2 * sizes[:, None]
    return np.bincount(index[keep].ravel(), shape[keep].ravel(), N)


def turbulence(apart):
    """Noise of rms 1 at two ports; a share of its treble and deep bass is unrelated between them."""
    common, own = rng.standard_normal(N), rng.standard_normal((2, N))
    deep = soften(soften(own, 210.0), 197.0)
    return unit(common + apart * (own - soften(own, 3040.0) + 0.59 * deep))


def response(modes, column=2, size=4096):
    """Causal response of steep resonances whose powers add, from the cepstrum of the log gain."""
    hz = np.arange(size // 2 + 1) * SR / size
    power = sum(undb(2 * m[column]) / (1 + (2 * (hz - m[0]) / m[1]) ** 2) ** 2 for m in modes)
    cepstrum = irfft(np.log(power + 0.0013) / 2)  # the small floor keeps gaps from going silent
    # folding the cepstrum forward makes the response causal
    cepstrum[1:size // 2] *= 2
    cepstrum[size // 2 + 1:] = 0
    return irfft(np.exp(rfft(cepstrum)))[:size // 2]


def band(x, hz, width_hz):
    """Band-pass with gain 1 at the centre."""
    return signal.lfilter(*signal.iirpeak(hz, hz / width_hz, fs=SR), x)


def hollow(x, rows, depth=1):
    """Take a share out of each band."""
    for hz, width_hz, share in rows:
        x = x - share * depth * band(x, hz, width_hz)
    return x


def soften(x, hz):
    """One-pole low-pass."""
    return signal.lfilter(*signal.butter(1, hz, fs=SR), x)


def walk(rate):
    """Random levels held 1 / rate s and slewed twice; spread near 1."""
    k = int(SR / rate)
    held = np.repeat(rng.standard_normal(N // k + 1), k)
    return 0.68 * uniform_filter1d(uniform_filter1d(held, k), k)[:N]


def curve(table):
    """Rows of (time [s], value) joined by straight lines."""
    return np.interp(np.arange(N) / SR, *np.transpose(table))


def gate(start_s, end_s, edge_s=0.0021):
    """1 between two times, with short edges."""
    t = np.arange(N) / SR
    return np.clip((t - start_s) / edge_s + 1, 0, 1) * np.clip((end_s - t) / edge_s, 0, 1)


def since(s):
    """Seconds since a moment, 0 before it."""
    return np.maximum(np.arange(N) / SR - s, 0)


def unit(x):
    """Scale to rms 1."""
    return x / np.sqrt(np.mean(x ** 2))


def undb(db):
    """Decibels to gain."""
    return 10 ** (np.asarray(db) / 20)


def scene():
    """Arc and sparks through the recess, plus pops, nozzle, valve, pedal, draughts, gas and shop."""
    near = undb(1.0) * arc_in_recess()
    high = hollow(ports(sparks(), RAISED_LEFT, RAISED_RIGHT), HOLLOWS)
    return near + high + pops() + nozzle() + valve() + pedal() + thuds() + gas() + shop()


def record(dry):
    """The phone drops the deepest bass, rounds the loudest peaks and cuts the top."""
    wet = dry - soften(dry, 68.0)
    rounded = np.tanh(1.082 * wet) / 1.232
    return signal.sosfilt(signal.ellip(12, 0.2, 90, TOP_HZ, fs=SR, output="sos"), rounded)


dry = scene()
out = record(dry)
persist_wave(out)
```